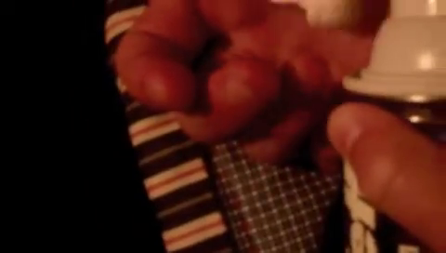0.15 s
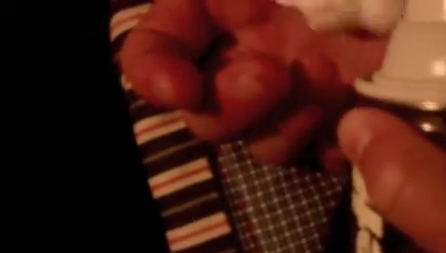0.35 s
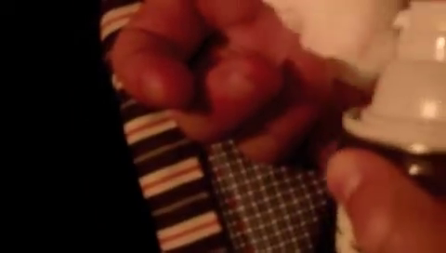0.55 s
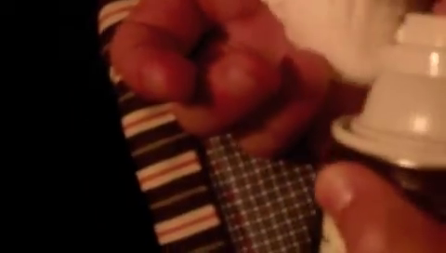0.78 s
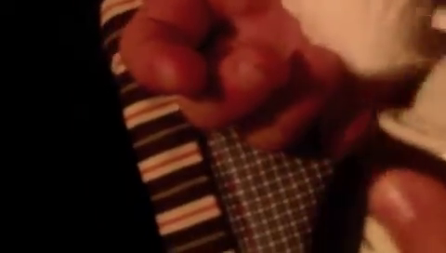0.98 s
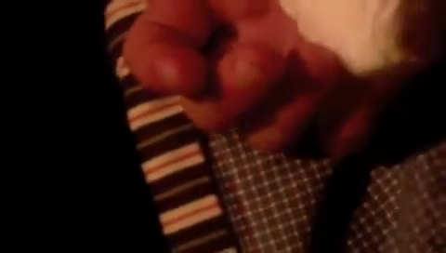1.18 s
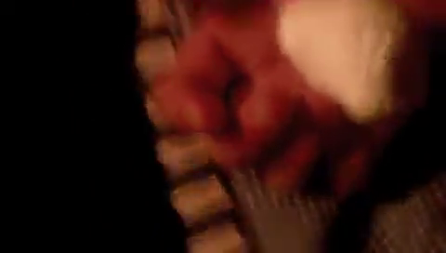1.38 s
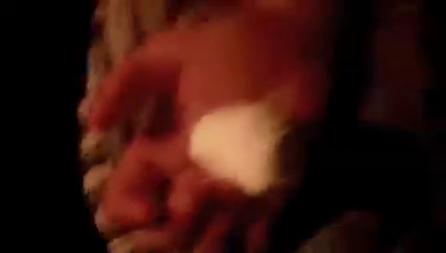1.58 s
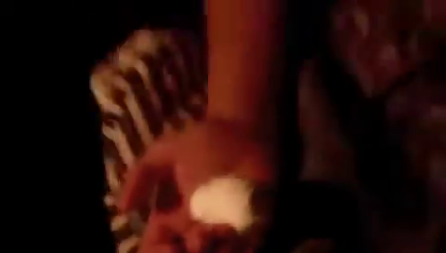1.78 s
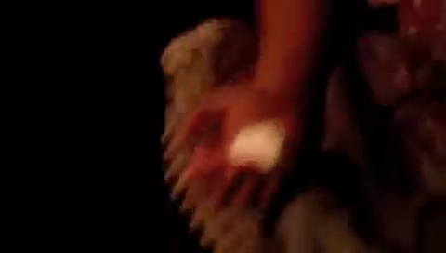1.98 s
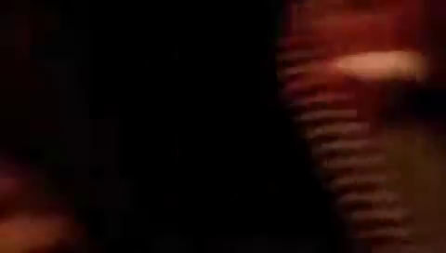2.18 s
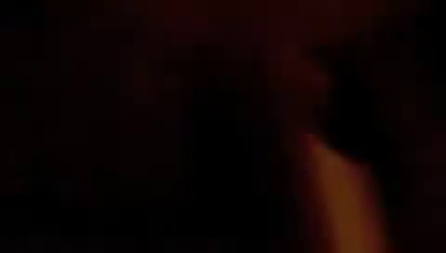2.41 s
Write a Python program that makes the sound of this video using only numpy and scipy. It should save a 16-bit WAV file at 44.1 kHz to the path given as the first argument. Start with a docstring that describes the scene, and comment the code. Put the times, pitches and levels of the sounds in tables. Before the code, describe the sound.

Close to the microphone in a small furnished room, foam spurts from a can: sharp click, brief hiss, rough wet sputter growing bubbly, abrupt stop, then soft settling fizz, slight cloth rustles and handling ticks.

```python
"""Foam from a pressurised can

Gas leaks through a pressed valve as resonant noise and the button clicks as a set of decaying modes.
Foam then sputters out: turbulence and bubble pops excite nozzle resonances, most of which sink as
foam piles up. The valve shuts, leaving steady room noise with a faint fizz of settling foam (resonant
grainy noise), cloth and skin rustles (bursts of the same) and small ticks (struck resonances).
"""
import sys
import numpy as np
from scipy import signal
from scipy.fft import rfft, irfft
from scipy.io import wavfile
from scipy.ndimage import uniform_filter1d, minimum_filter1d

SR = 44100
rng = np.random.default_rng(int(sys.argv[2]) if len(sys.argv) > 2 else 0)


def digitize_waveform(pressure):
    """Quantize a signal to 16-bit integers and store it at the path in sys.argv[1].

    Rows of a 2-D input are taken as channels; values are limited to [-1, 1].
    """
    field = np.atleast_2d(pressure).T
    bounded = np.clip(field, -1, 1)
    quanta = np.round(bounded * 32767).astype(np.int16)
    wavfile.write(sys.argv[1], SR, quanta)


def invert_db(x):
    """Field ratio 10**(x/20) for x, a level in decibels (scalar or array-like)."""
    u = np.asarray(x, float) / 20
    return 10 ** u


N = 108045
T = np.arange(N) / SR

# foam flow: (time [s], level [dB], foam piled round the nozzle [0-1])
FOAM_FLOW = [(.3, -54, 0), (.322, -27.5, 0.2), (.331, -19, 0), (.35, -16, 0.02), (.4, -12.5, 0.07),
             (.44, -17.5, 0.2), (.53, -16.5, 0.52), (.62, -16.5, 0.58), (.75, -14.5, 0.86),
             (.89, -17, 0.95), (.912, -20, 1), (.926, -39, 1), (.945, -45, 1), (.97, -50, 1),
             (1.03, -55, 1)]
# nozzle and foam cavity modes, nominal:
# (bare pitch [Hz], buried pitch [Hz], width [Hz], bare level [dB], buried level [dB])
CAVITY_MODES = [(278, 220, 143, -16.5, -15.5), (490, 671, 186, -20, -17), (820, 642, 230, -15.5, -7.5),
                (1185, 821, 155, 1, 1), (1437, 1239, 100, -22, 0.5), (1540, 1673, 97, -64, 8),
                (2411, 1949, 247, 6.5, -2.5), (2590, 2750, 300, -10, -10), (3000, 3188, 180, -8, -6.5),
                (3900, 3690, 490, -7.5, -16), (4540, 4195, 560, -24.5, -10), (5420, 5200, 310, -4.5, -18)]
# gulps of gas in the foam:
# (time [s], 1/e half-length [s], relative lift [dB], pitch lifted most [Hz])
GAS_GULPS = [(0.394, 0.02, 3, 1100), (0.4, 0.0041, 8, 1090), (0.423, 0.0023, -1, 1150),
             (0.433, 0.016, 6.5, 2300), (0.457, 0.0078, 6.5, 1050), (0.482, 0.0039, 7, 2200),
             (0.527, 0.0062, -1, 1510), (0.55, 0.0032, 4, 3500), (0.635, 0.0025, 1, 1010),
             (0.681, 0.011, 6.5, 1460), (0.813, 0.005, 13.5, 2100), (0.868, 0.019, 7.5, 1250),
             (0.493, 0.0074, 6, 2260), (0.52, 0.0085, 6.5, 2200), (0.557, 0.0065, 7, 3240),
             (0.6, 0.0063, 16, 1900), (.7, 0.0035, 9, 1640), (0.579, 0.0019, 19, 4260),
             (0.714, 0.0043, 14, 5300), (0.521, 0.0047, 4.5, 2000), (0.648, 0.0034, 18.5, 1800),
             (0.739, 0.011, 12.5, 3000), (0.774, 0.0023, 18, 2530), (0.831, 0.0068, 13, 3230),
             (0.852, 0.006, 14, 3000), (0.895, 0.011, 15.5, 3540)]
GULP_REACH_OCT = 0.85  # 1/e half-width of a gulp's lift in pitch
POPS_PER_S, POP_DB, POP_SPREAD_DB = 2500, -4, 3.5  # mean rate, level against turbulence, size spread
SPUTTER_DB, SPUTTER_LOW_HZ, SPUTTER_HIGH_HZ = 1.9, 60, 200  # rms level swing shared by all modes
MODE_SWING_DB = 1.6  # rms level swing of each mode by itself
LOCKING = .35  # how far the jet locks to each mode and steadies its ring, 0-1
# the jet starts flat and dull, then settles: time, time constant, fraction of pitch, treble loss
OPEN_S, SETTLE_S, START_FLAT, START_LOSS_DB_PER_OCT = 0.36, 0.023, 0.069, 25

# gas hissing at the valve: (time [s], level [dB])
GAS_FLOW = [(.08, -77), (.115, -46.5), (.155, -51.5), (.175, -38.5), (.27, -37), (.31, -35), (.34, -27.5),
            (.45, -29.5), (.56, -24.5), (.7, -28), (.9, -28), (.916, -36), (.93, -50), (.97, -58),
            (1.05, -68)]
# broad spectrum of the hiss: (frequency [Hz], relative density [dB per Hz])
GAS_SPECTRUM = [(290, -25), (500, 2), (1150, 1), (1750, -34), (2200, 6.5), (4380, -8.5), (6360, -27),
                (7030, 7), (15500, -39.5)]
# valve resonances: (frequency [Hz], width [Hz], level as a dry leak [dB], level under foam [dB])
VALVE_MODES = [(2210, 1250, -7, 9), (4430, 810, 4.5, -1), (4970, 280, -7, -1), (6600, 380, -18, -2),
               (7030, 130, 4, 0.5), (7590, 690, -2, -2), (8230, 800, -4.5, -1.5), (9630, 1400, -45, -14),
               (11200, 1200, -5, -24), (12600, 1400, -7, -22), (13900, 2700, -25, -14)]
WET_S, WETTING_S = 0.295, 0.051  # foam reaches the valve; time taken to wet it

# button modes: (frequency [Hz], relative level [dB], 60 dB decay time [s])
BUTTON_MODES = [(400, -14, .02), (790, -11, 0.0099), (1280, -6, .018), (2070, -1, .014), (2546, 1, .014),
                (3620, -8, .012), (5100, 0.5, 0.0057), (7050, -1, 0.0047), (8300, 1.5, 0.0043),
                (9200, -13, 0.0055), (10700, -25, .005), (13500, -22, .005), (14900, -18, .004)]
# the button gives in three slips: (time [s], level [dB], tilt about 3 kHz [dB per octave])
BUTTON_SLIPS = [(0.164, -16, -2.5), (0.1657, -17, 6), (0.1654, -18, -4.5)]
SLIP_RISE_S = 0.0001

# dips where sound bounced off the hand cancels the direct sound:
# (frequency [Hz], 1/e half-width [Hz], depth [0-1])
HAND_DIPS = [(1666, 116, 0.85), (3500, 84, 0.03), (6000, 140, 0.23), (7030, 78, 0.63), (8830, 620, 0.6)]
CAN_LOW_HZ = 439

# small ticks and knocks: (time [s], peak level [dB], frequency [Hz], width [Hz])
TICK_TAPS = [(.179, -27, 1400, 250), (.978, -42, 7800, 2000), (1.022, -44, 7800, 2000),
             (1.364, -34, 700, 350), (1.369, -31, 2000, 1000), (1.452, -44, 950, 50),
             (1.457, -45, 1300, 120), (1.45, -45, 4000, 700), (1.455, -43, 4200, 900),
             (1.485, -43, 3900, 800), (1.495, -41, 3800, 600), (1.509, -41, 4000, 800),
             (1.522, -42, 4500, 2000), (2.144, -38, 5500, 3000), (2.143, -44, 2850, 130),
             (2.2, -35, 11500, 6000), (2.318, -34, 900, 800), (2.318, -42, 6500, 3000),
             (2.33, -30, 600, 500), (2.331, -40, 2800, 1500), (2.344, -44, 3800, 500),
             (2.355, -42, 7000, 1800), (2.413, -42, 7000, 1500)]
# faint rustles: (start [s], length [s], level [dB], frequency [Hz], width [Hz])
RUSTLE_BURSTS = [(0, 0.049, -59, 3300, 404), (0, 0.33, -51, 860, 684), (.98, 0.23, -63.5, 5770, 500),
                 (1.245, 0.16, -59.5, 5750, 600), (1.463, .03, -59, 6860, 500),
                 (1.634, 0.082, -61, 2920, 300), (1.64, 0.13, -49, 1700, 400),
                 (1.648, 0.13, -60, 5630, 3030), (2.142, 0.036, -57, 2860, 500),
                 (2.194, 0.065, -57, 2620, 400), (2.3, 0.043, -61, 3900, 700),
                 (2.296, 0.13, -67, 8000, 4000), (1.74, 0.098, -47, 353, 300)]
# settling foam: (time [s], level [dB])
FIZZ_FLOW = [(.91, -38), (.96, -42), (1.03, -50), (1.2, -50.5), (1.4, -53.5), (1.6, -67)]
FIZZ_HZ, FIZZ_WIDTH_HZ = 1590, 510

ECHO_DB, ECHO_T60_S = -20, 0.18
# room noise spectrum: (frequency [Hz], relative density [dB per Hz])
ROOM_SPECTRUM = [(20, 1.5), (60, 1), (120, 1), (324, -5.5), (932, -11), (1540, -15), (1920, -19),
                 (3170, -20), (4070, -24.5), (6000, -26), (9000, -29.5), (12000, -35.5), (14200, -33),
                 (15500, -37)]
ROOM_DB, ROOM_SWELL_DB = -44.5, .7  # level and its rms swing

MIC_LOW_HZ, EDGE_HZ = 43.6, 15310  # bass cut and upper band edge
CEILING = .95  # limiter threshold, amplitude


def evened(x):
    """Normalises a signal to unit rms."""
    return x / np.sqrt(np.mean(x ** 2) + 1e-20)


def curve(rows, column=1):
    """Interpolates a table column linearly in time, holding its end values."""
    rows = np.array(rows)
    return np.interp(T, rows[:, 0], rows[:, column])


def level(rows):
    """Converts a level curve in dB to gain, silent outside the table."""
    return invert_db(curve(rows)) * (T > rows[0][0]) * (T < rows[-1][0])


def coloured(points):
    """Shapes white noise by a spectrum interpolated over log frequency, at unit rms."""
    f, db = np.transpose(points)
    hz = np.fft.rfftfreq(N, 1 / SR)
    gain = invert_db(np.interp(np.log(hz + 1), np.log(f + 1), db))
    return evened(irfft(rfft(rng.standard_normal(N)) * gain, N))


def lumps(high_hz, low_hz=0.033):
    """Random fluctuation of unit rms, confined softly between two modulation frequencies."""
    f = np.fft.rfftfreq(N, 1 / SR)
    spectrum = rfft(rng.standard_normal(N)) / (1 + (f / high_hz) ** 4)
    return evened(irfft(spectrum / (1 + (low_hz / (f + 0.0095)) ** 2), N))


def resonate(x, hz, width):
    """Double-pole resonance of unit peak gain: shift to zero frequency, smooth, shift back."""
    turn = np.exp(2j * np.pi * np.cumsum(hz * np.ones(len(x))) / SR)  # hz may be a pitch curve
    r = np.exp(-np.pi * width * 1.5 / SR)  # each stage is wider, as two in series narrow the band
    smooth = signal.lfilter([(1 - r) ** 2], [1, -2 * r, r * r], x / turn + 1e-18)
    return 2 * (turn * smooth).real


def bubbling_jet():
    """Turbulence is continuous noise; bursting bubbles are random impulses of either sign."""
    size = invert_db(POP_SPREAD_DB * np.minimum(rng.exponential(1, N), 3)) * rng.choice([-1, 1], N)
    pops = evened(size * (rng.random(N) < POPS_PER_S / SR))
    jet = evened(rng.standard_normal(N) + invert_db(POP_DB) * pops)
    return jet * invert_db(SPUTTER_DB * lumps(SPUTTER_HIGH_HZ, SPUTTER_LOW_HZ))


def gulp_lift_db(hz):
    """A gulp of gas excites a mode more the nearer their pitches lie, for a brief moment."""
    lift_db = np.zeros(N)
    for s, length, db, top in GAS_GULPS:
        octaves = np.log2(hz[round(s * SR)] / top)
        nearness = np.exp(-(octaves / GULP_REACH_OCT) ** 2)
        lift_db += db * np.exp(-((T - s) / length) ** 2) * nearness
    return lift_db


def foam():
    """Forced resonance: the jet rings cavity modes that shift in pitch and level as foam piles up."""
    drive = bubbling_jet()
    pile = curve(FOAM_FLOW, column=2)
    fresh = np.exp(-np.clip(T - OPEN_S, 0, None) / SETTLE_S)
    out = np.zeros(N)
    for k, (bare, buried, width, bare_db, buried_db) in enumerate(CAVITY_MODES):
        hz = (bare + (buried - bare) * pile) * (1 - START_FLAT * fresh)
        ring = resonate(drive, hz, 1.41 * width)
        ring = evened(resonate(ring, hz, 1.67 * width))
        envelope = np.abs(signal.hilbert(ring))
        ring = ring / (envelope + .2) ** LOCKING
        swing_db = MODE_SWING_DB * lumps(120, low_hz=40)
        ring = evened(ring * invert_db(gulp_lift_db(hz) + swing_db))
        octaves_up = max(np.log2(bare / 2500), 0)
        ring = ring * invert_db(-START_LOSS_DB_PER_OCT * fresh * octaves_up)
        # neighbouring modes have opposite polarity
        out += (-1) ** k * invert_db(bare_db + (buried_db - bare_db) * pile) * ring
    return level(FOAM_FLOW) * out / 2


def gas():
    """Leak turbulence: broad hiss plus valve resonances whose balance changes once foam wets them."""
    white = rng.standard_normal(N)
    wet = np.clip((T - WET_S) / WETTING_S, 0, 1)
    tones = np.zeros(N)
    for hz, width, dry_db, wet_db in VALVE_MODES:
        mode_db = dry_db + (wet_db - dry_db) * wet + 1.66 * lumps(23.6, low_hz=4.6)
        tones += invert_db(mode_db) * evened(resonate(white, hz, width))
    hiss = tones / 2 + invert_db(-3.5) * coloured(GAS_SPECTRUM)
    flutter_db = 1.3 * lumps(135, low_hz=24) + 2 * lumps(490, low_hz=100)
    return level(GAS_FLOW) * invert_db(flutter_db) * hiss


def clicks():
    """Modal decay: each slip of the button starts its modes as exponentially damped sines."""
    out = np.zeros(N)
    for s, level_db, tilt_db in BUTTON_SLIPS:
        t = np.clip(T[:SR // 4] - s, 0, None)
        rise = 1 - np.exp(-t / SLIP_RISE_S)
        for hz, db, t60 in BUTTON_MODES:
            mode_db = level_db + db + tilt_db * np.log2(hz / 3000)
            out[:len(t)] += invert_db(mode_db - 60 * t / t60) * rise * np.sin(2 * np.pi * hz * t)
    return out


def past_hand(x):
    """A small source radiates little bass; interference with hand reflections cuts spectral dips."""
    x = signal.sosfilt(signal.butter(3, CAN_LOW_HZ, "high", fs=SR, output="sos"), x)
    hz = np.fft.rfftfreq(N, 1 / SR)
    gain = np.ones(len(hz))
    for f, width, depth in HAND_DIPS:
        gain *= 1 - depth * np.exp(-((hz - f) / width) ** 2)
    return irfft(rfft(x) * gain, N)


def ticks():
    """Impulse response: each tick is one tap ringing a damped resonance."""
    out = np.zeros(N)
    for s, db, hz, width in TICK_TAPS:
        ring = resonate(signal.unit_impulse(1500), hz, width)
        out[round(s * SR):][:1500] += invert_db(db) * ring / np.abs(ring).max()
    return out


def grain():
    """Amplitude-modulated noise: rapid random level changes make it grainy."""
    return rng.standard_normal(N) * invert_db(2.3 * lumps(220, low_hz=50))


def fizz():
    """Settling foam is grainy noise through one broad resonance, fading in time."""
    return level(FIZZ_FLOW) * evened(resonate(grain(), FIZZ_HZ, FIZZ_WIDTH_HZ))


def rustles():
    """Friction of cloth and skin is resonant grainy noise under half-sine envelopes."""
    scrape = grain()
    out = np.zeros(N)
    for start, length, db, hz, width in RUSTLE_BURSTS:
        envelope = np.sin(np.pi * np.clip((T - start) / length, 0, 1))
        out += invert_db(db) * envelope * evened(resonate(scrape, hz, width))
    return out


def echo(x):
    """Reverberation: convolution with dull, exponentially decaying noise, as in a furnished room."""
    t = T[:SR // 2]
    dull = signal.lfilter([1], [1, -.8], rng.standard_normal(len(t)))
    tail = dull * invert_db(-60 * t / ECHO_T60_S) * (t > .006)
    return invert_db(ECHO_DB) * signal.oaconvolve(x, tail / np.linalg.norm(tail))[:N]


def room():
    """Background noise is stationary coloured noise with a slight random swell."""
    return invert_db(ROOM_DB + ROOM_SWELL_DB * lumps(9)) * coloured(ROOM_SPECTRUM)


def scene():
    """Superposition: the can, its reverberation and the small sounds add to the room noise."""
    can = past_hand(foam() + gas() + clicks())
    return (can + echo(can) + ticks() + fizz() + rustles() + room())[None]


def limited(x):
    """Peak limiting: a smoothed gain turns down samples around any peak above the ceiling."""
    gain = np.minimum(CEILING / (np.abs(x) + 1e-9), 1)
    return x * uniform_filter1d(minimum_filter1d(gain, size=201), size=101)


def top_cut(x):
    """Nothing passes above the cut-off."""
    return signal.sosfilt(signal.butter(12, 16470, fs=SR, output="sos"), x)


def record(dry):
    """Linear filtering bounds the band below and above, with peak limiting in between."""
    x = signal.sosfilt(signal.butter(2, MIC_LOW_HZ, "high", fs=SR, output="sos"), dry)
    x = limited(x)
    lowpass = signal.firwin(1601, EDGE_HZ, window=("kaiser", 9), fs=SR)
    x = signal.oaconvolve(x, lowpass[None], "same")
    return top_cut(x)


dry = scene()
out = record(dry)
digitize_waveform(out)
```